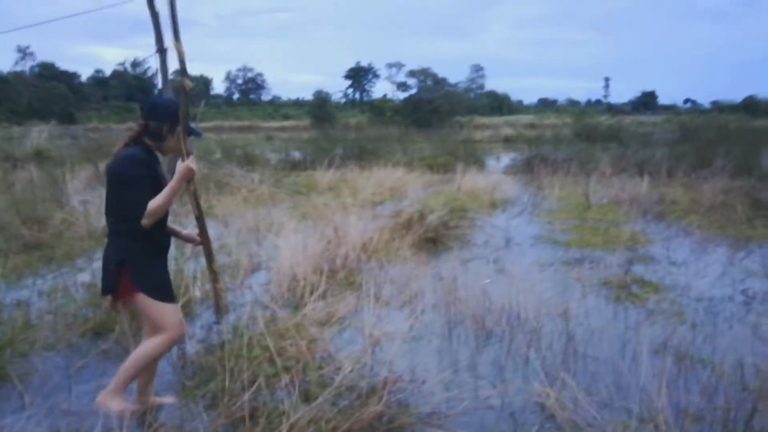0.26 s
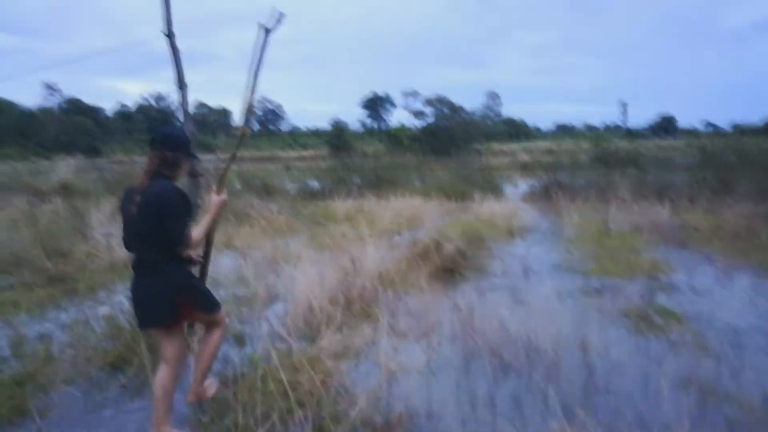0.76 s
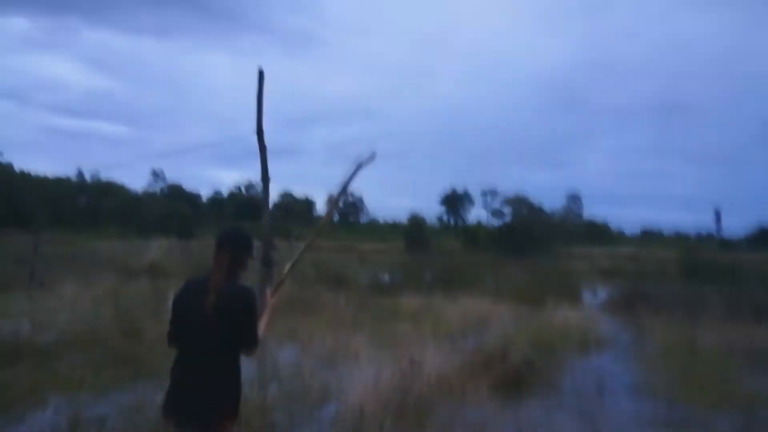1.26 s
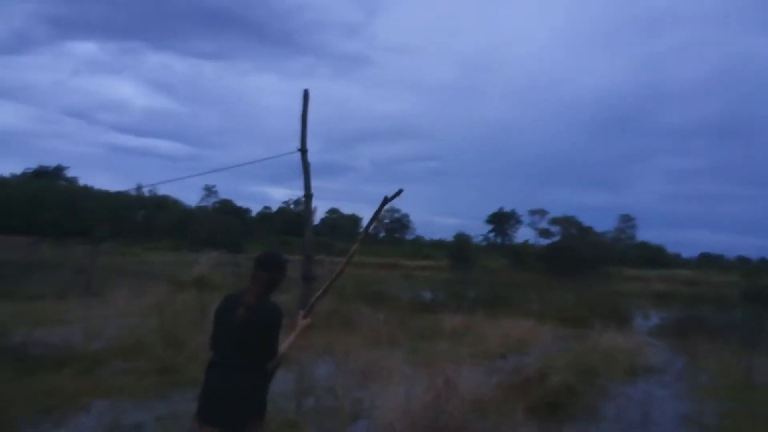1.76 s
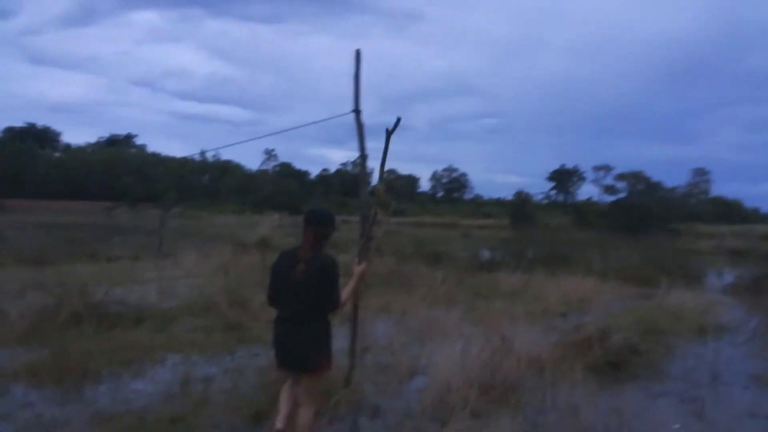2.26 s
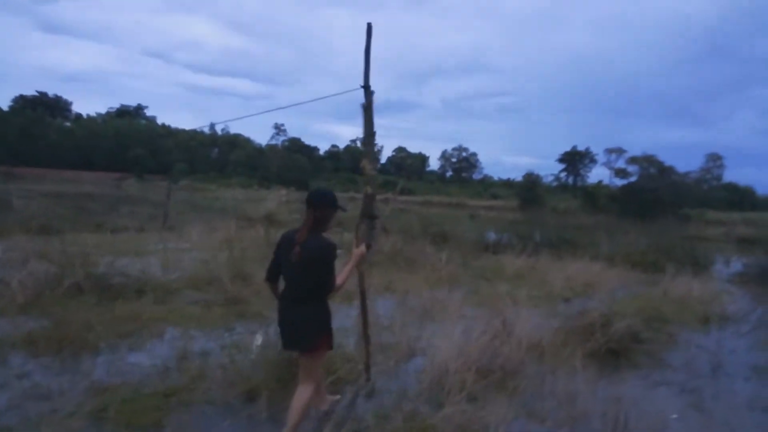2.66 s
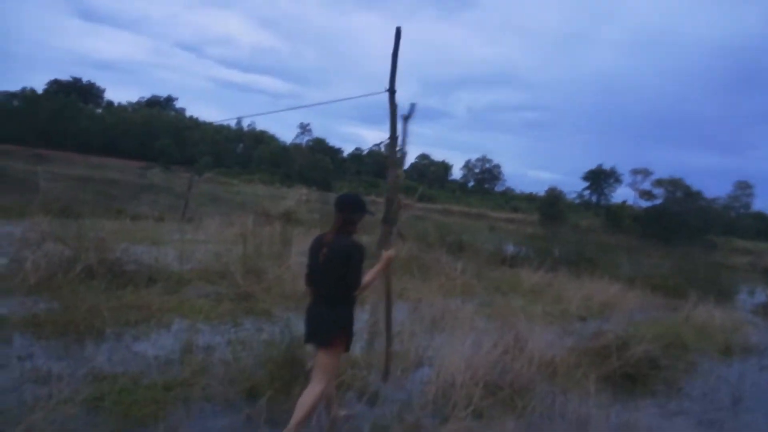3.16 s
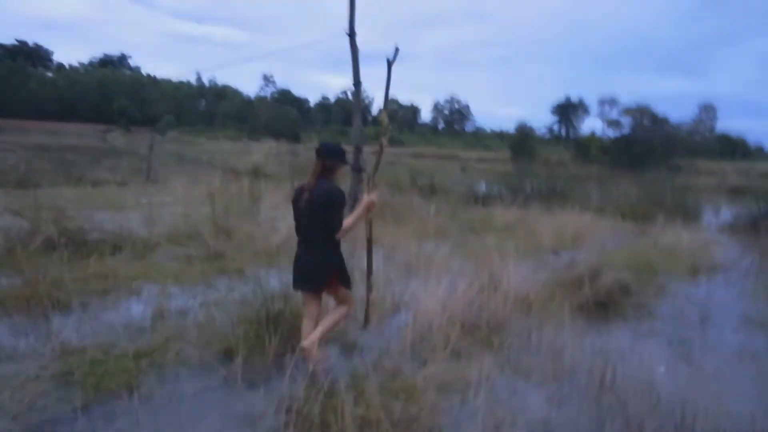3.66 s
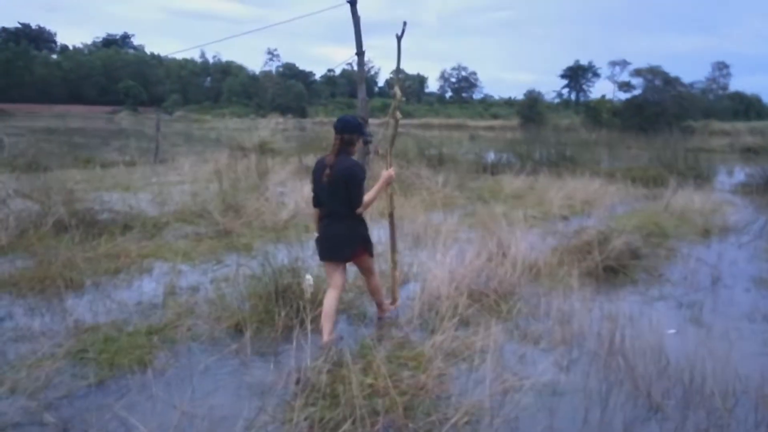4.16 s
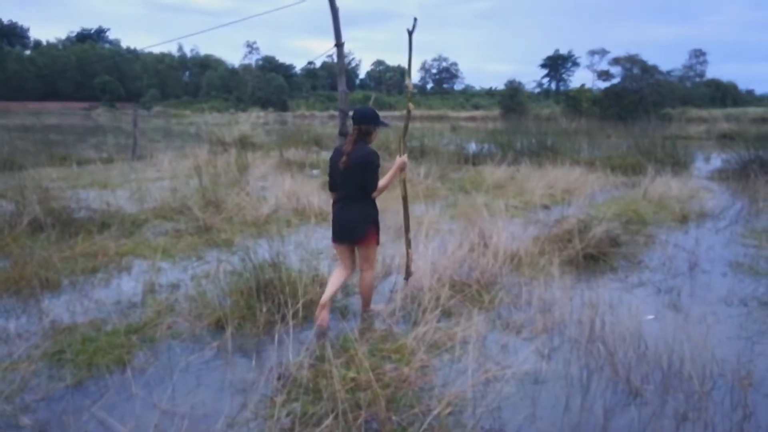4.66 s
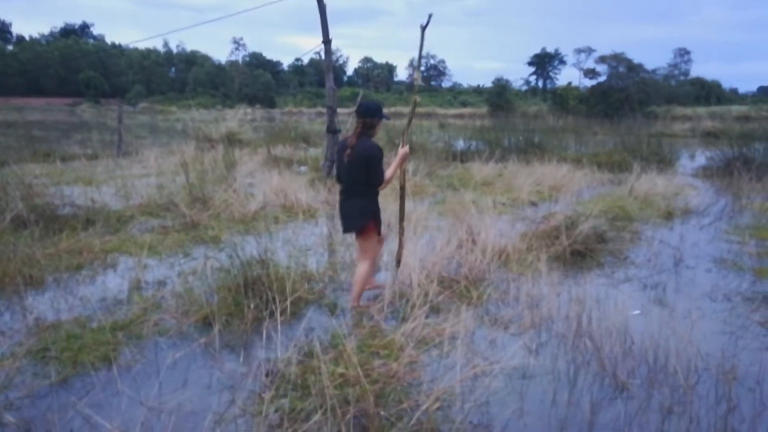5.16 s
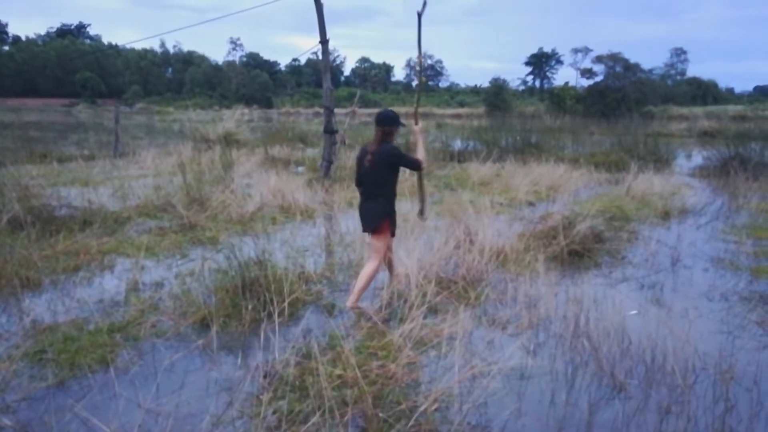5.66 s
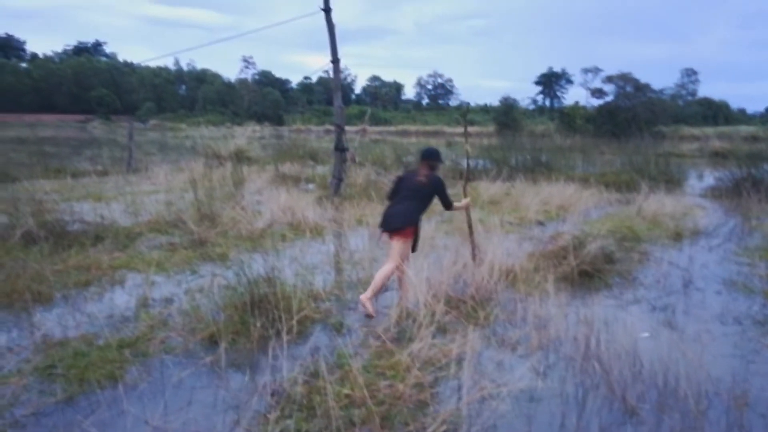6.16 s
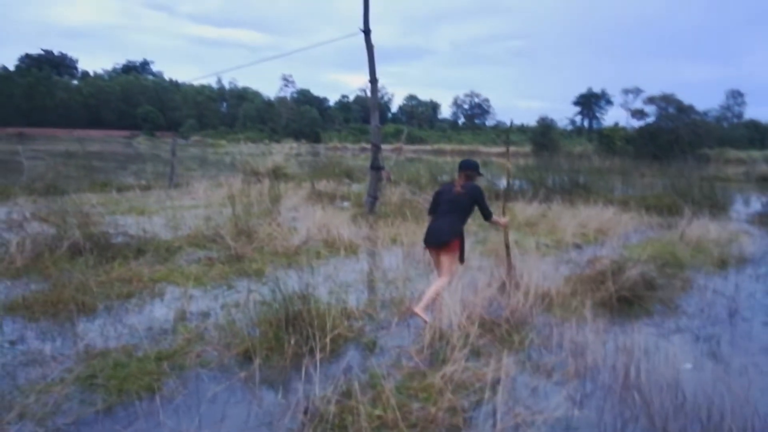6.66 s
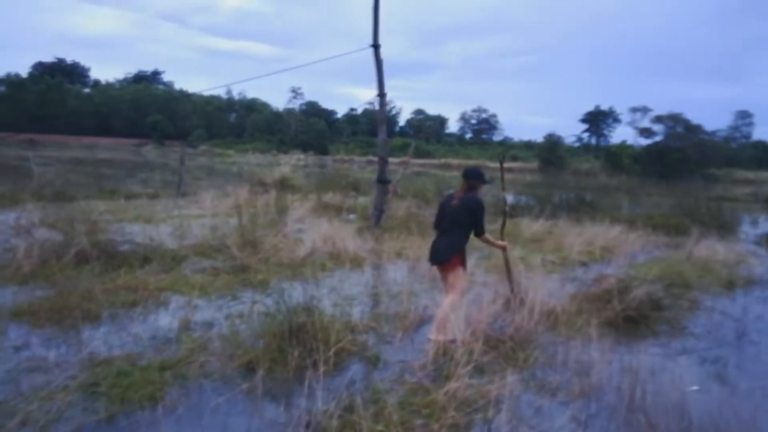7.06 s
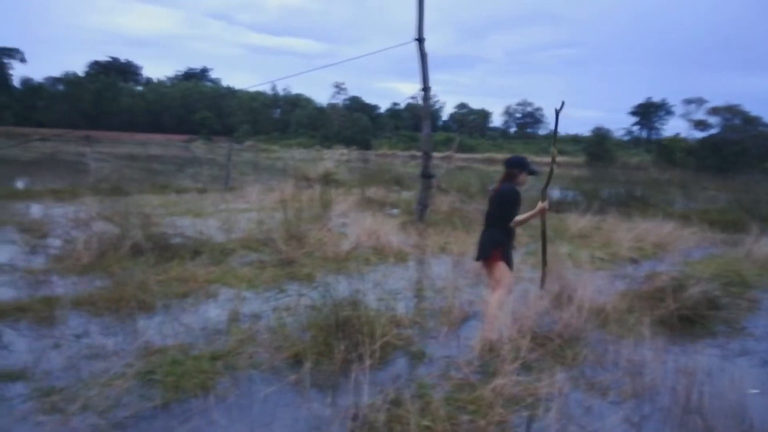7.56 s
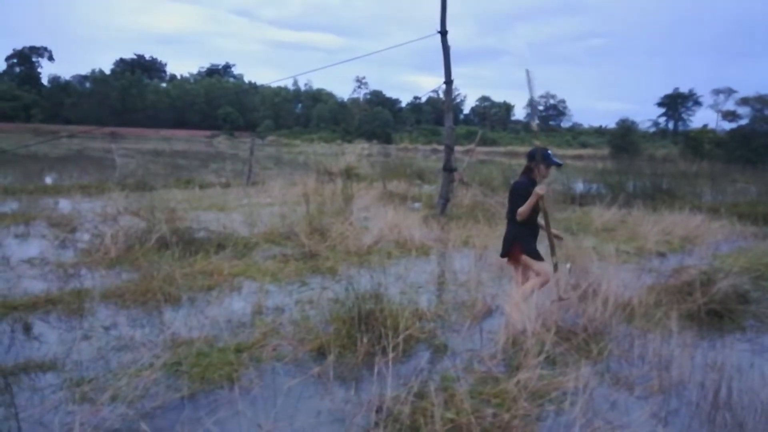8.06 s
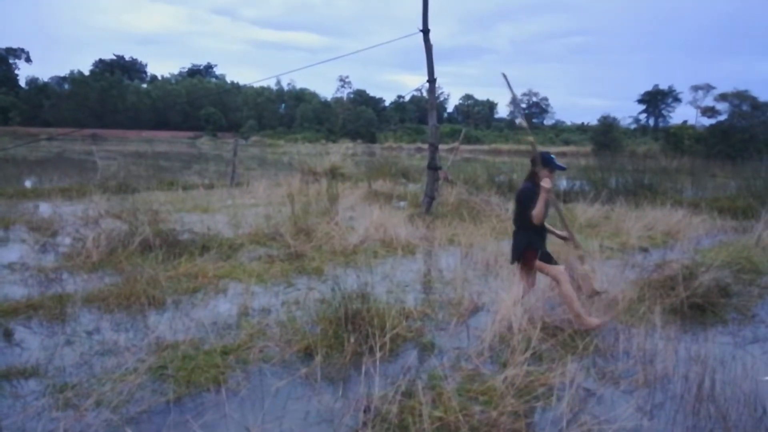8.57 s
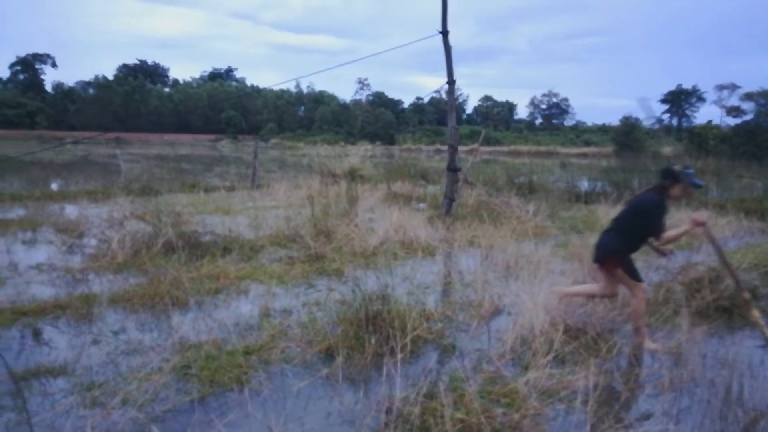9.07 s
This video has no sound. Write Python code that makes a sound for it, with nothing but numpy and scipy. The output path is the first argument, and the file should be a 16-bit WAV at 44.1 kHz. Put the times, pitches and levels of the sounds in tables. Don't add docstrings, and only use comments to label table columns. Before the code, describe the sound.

Outdoors in a flooded grassy field, about a dozen frogs give short buzzy quacks, several per second, left and right, over a blurred distant chorus. A person wades past with soft swishes; around six seconds a stalk tears and snaps very loudly, followed by sloshing. Frogs thin out near the snap, then quack densely again. A moving stereo microphone, duller on the left, catches low wind.

```python
import sys
import numpy as np
from scipy import signal
from scipy.fft import rfft, irfft
from scipy.io import wavfile
from scipy.ndimage import uniform_filter1d

SR = 44100
rng = np.random.default_rng(int(sys.argv[2]) if len(sys.argv) > 2 else 0)


def volts(x):
    e = np.asarray(x, float) / 20
    return 10 ** e


def file_out(sig):
    cols = np.atleast_2d(sig).T
    lim = np.clip(cols, -1, 1)
    pcm = np.round(lim * 32767).astype(np.int16)
    wavfile.write(sys.argv[1], SR, pcm)


N = 410130

ROUGH_JITTER = .018


def shape(x, points):
    hz, db = np.transpose(points)
    f = np.maximum(np.fft.rfftfreq(x.shape[-1], 1 / SR), 1)
    gain = volts(np.interp(np.log(f), np.log(hz), db))
    return irfft(rfft(x) * gain, x.shape[-1])


def unit(x):
    return x / np.sqrt(np.mean(x ** 2))


def curve(table):
    s, *columns = np.transpose(table)
    return [np.interp(np.arange(N) / SR, s, c) for c in columns]


def add(out, s, sound):
    i = int(s * SR)
    out[:, i:i + sound.shape[-1]] += sound[..., :max(N - i, 0)]


def resonance(f, hz, width_hz, order=2):
    h = (1j * f * width_hz / (hz ** 2 - f ** 2 + 1j * f * width_hz)) ** order
    return h / np.sqrt(np.mean(np.abs(h) ** 2))


def edge(f, hz, order):
    return 1 / np.sqrt(1 + (np.maximum(f, 1) / hz) ** (2. * order))


def walk(rate):
    k = int(SR / rate)
    held = np.repeat(rng.standard_normal(N // k + 1), k)
    return unit(uniform_filter1d(uniform_filter1d(held, k), k)[:N])


def flutter(x, span):
    wobble = rng.standard_normal(x.shape)
    for _ in range(4):
        wobble = uniform_filter1d(wobble, span)
    return unit(wobble)


def pulses(length, mid_hz, glide, jitter, attack, fading, size):
    u = np.arange(int(length * SR)) / (length * SR)
    start, settle, drift, turn = glide
    percent = start * np.exp(-u / settle) + drift * (u - .45)
    percent = percent + turn * np.clip((u - .7) / .3, 0, 1) ** 2
    phase = np.cumsum(mid_hz * (1 + percent / 100)) / SR
    chance = rng.standard_normal((80, 2))[:int(phase[-1]) + 1].T
    at = np.interp(np.arange(chance.shape[1]) + jitter * np.cumsum(chance[0]), phase, u)
    swell = 1 - 1.5 * attack * (1 - np.sin(np.pi / 2 * np.minimum(at / attack, 1)))
    swell = swell * (1 + (attack < .01) * .5 * np.exp(-at * length / .008))
    fade = np.sin(np.pi / 2 * np.clip((1.04 - at) / fading, 0, 1))
    push = swell * fade * volts(50 * jitter * chance[1]) * np.sqrt(SR / mid_hz)
    delay = at * length * SR + 20
    shifts = np.exp(-2j * np.pi * np.outer(delay, np.arange(size // 2 + 1)) / size)
    return push * np.array([1 - at, at]) @ shifts


def sac_and_body(f, hz, heard, lo_hz, ratio, jitter):
    # f/Hz, width/Hz, polarity
    body_modes = [(2100, 1100, 1), (5000, 1600, 1), (6400, 2200, -1)]
    rough = jitter > ROUGH_JITTER
    depth, order = (.9, 2.2) if rough else (1, 2)
    body = np.array([sign * resonance(f, mode_hz * d, width * d)
                     for (mode_hz, width, sign), d in zip(body_modes, (depth, 1, 1))])
    band = edge(f, lo_hz, order=-5) + volts(-17) * edge(f, 600, order=-3)
    band = band * edge(f, 7500 / depth ** 4.5, order=9)
    overtone = resonance(f, ratio * hz, 850) * edge(f, 13000 * max(ratio / 3, 1), order=9)
    if rough:
        overtone = overtone + volts(-25) * resonance(f, 3.8 * hz, 600)
    damping = .8 if jitter <= .01 else 1.15 if rough else 1
    sac = band * resonance(f, hz, 700 * damping, order)
    return heard @ np.vstack([band * body, overtone]) - sac


def frogs():
    # t/s, length/s, level/dB, midway pulse rate f/Hz
    near_right = [
        (0.0, .034, -21.5, 486.5),
        (.177, 0.06, -23, 474),
        (.391, 0.063, -23.5, 480),
        (.604, 0.057, -23.5, 471),
        (.815, 0.056, -22.5, 482.5),
    ]
    steady_left = [(0.452, 0.041, -33, 469), (0.825, 0.075, -28.5, 451), (1.109, 0.069, -25.5, 447.4),
                   (1.378, 0.091, -26.5, 453), (1.674, 0.062, -26.5, 437), (1.981, 0.058, -26, 438),
                   (2.263, 0.076, -27, 435.5), (2.538, 0.081, -28, 440), (2.814, 0.0845, -28.5, 435),
                   (3.107, 0.062, -27, 431), (3.404, 0.077, -28.5, 429), (3.664, 0.09, -28.5, 442.4)]
    deep_left = [(.25, 0.054, -31, 451), (0.553, 0.059, -32, 443.4), (1.136, 0.05, -29.5, 435),
                 (1.405, 0.041, -26.5, 433), (1.628, 0.049, -25.5, 439), (1.849, 0.067, -27, 448),
                 (2.11, 0.069, -27.5, 437.6), (2.389, 0.075, -26.5, 438.5), (2.623, 0.065, -26.5, 438),
                 (2.835, 0.063, -27, 436), (3.05, 0.064, -26.5, 432), (3.261, 0.074, -28.5, 426),
                 (3.481, 0.072, -28, 431), (3.708, 0.062, -29, 422.5), (3.896, 0.067, -26, 416.4),
                 (4.119, 0.079, -27.5, 424), (4.347, 0.029, -28.5, 426)]
    small_right = [(.756, 0.043, -38.5, 507), (0.976, 0.047, -35.5, 486), (1.19, 0.048, -32, 479.4),
                   (1.393, 0.05, -33, 449), (1.606, 0.033, -32.5, 491), (1.813, 0.055, -31.5, 465),
                   (2.019, 0.046, -29.5, 445.6)]
    far_singer = [(3.335, 0.063, -37, 586), (3.588, 0.083, -36.5, 576), (4.653, 0.076, -36.5, 545),
                  (5.207, 0.068, -37.5, 559), (5.464, 0.07, -40.5, 552), (5.717, 0.073, -36, 554),
                  (5.985, 0.061, -37, 518), (6.223, 0.069, -40, 500), (9.138, 0.13, -33, 482)]
    rasper = [(3.664, 0.058, -31.5, 339.3), (3.877, 0.035, -30.5, 338), (3.914, 0.058, -27, 196),
              (3.979, 0.025, -31, 391), (4.008, 0.041, -31.5, 413), (4.145, 0.055, -27, 371),
              (4.199, 0.021, -27.5, 331.4), (4.23, 0.036, -28.5, 188.5), (4.269, 0.01, -35.5, 405),
              (4.375, 0.09, -25.5, 346), (4.568, 0.09, -27, 328.4), (4.755, 0.084, -28.5, 346.2),
              (4.939, 0.078, -27, 347.4), (5.119, 0.029, -27.5, 399.5), (5.165, 0.021, -29.5, 357.6),
              (5.205, 0.018, -30.5, 314)]
    stutterer = [(0.23, 0.043, -34, 396), (0.494, 0.026, -44, 390), (6.631, .015, -37, 424),
                 (7.239, 0.043, -29.5, 394), (7.411, 0.023, -29, 392), (7.44, 0.037, -29.5, 196.7),
                 (7.55, 0.06, -39.5, 165.6), (7.637, 0.053, -31, 452), (7.793, 0.029, -25, 431),
                 (7.846, 0.032, -29, 355), (7.884, 0.02, -31.5, 284), (8.011, 0.033, -27.5, 413),
                 (8.071, 0.019, -28.5, 334.4), (8.11, 0.017, -30, 306), (8.249, 0.03, -28.5, 438.6),
                 (8.312, 0.018, -28.5, 358), (8.357, 0.014, -30, 414), (8.5, 0.03, -27, 412),
                 (8.57, 0.023, -29.5, 424)]
    clear_right = [(6.97, 0.056, -27, 452.3), (7.238, 0.062, -26, 448), (7.479, 0.063, -25.5, 416.4),
                   (7.706, 0.063, -26, 423), (7.926, 0.063, -26.5, 426), (8.137, 0.068, -26.5, 434),
                   (8.358, 0.066, -26.5, 441.7), (8.568, 0.072, -27.5, 441), (8.79, 0.068, -27.5, 435.3),
                   (9.027, 0.067, -28, 435)]
    bright_left = [(6.832, 0.052, -31, 329.5), (7.1, 0.058, -30.5, 364.5), (7.35, 0.058, -29.5, 373),
                   (7.585, 0.063, -29.5, 392), (7.81, 0.062, -29.5, 403.4), (8.03, 0.071, -30.5, 417),
                   (8.249, 0.065, -30, 415), (8.475, 0.0575, -31.5, 416.5), (8.702, 0.072, -31.5, 421.4),
                   (8.93, 0.046, -29, 413), (9.165, 0.068, -32, 423.5)]
    loud_left = [
        (8.73, 0.026, -30.5, 463),
        (8.959, 0.034, -27.5, 463.4),
        (9.18, 0.0527, -28.5, 472.3),
    ]
    falling = [
        (6.331, 0.059, -37.5, 542),
        (6.552, 0.075, -34, 548),
        (6.785, .08, -33, 499),
        (7.004, 0.071, -35.5, 530),
    ]
    distant = [(2.331, 0.082, -45, 500), (2.779, 0.06, -43, 499), (2.971, 0.078, -40, 521),
               (3.2, 0.077, -39.5, 510), (5.948, 0.036, -48.5, 470), (6.15, 0.078, -44.5, 475),
               (6.385, 0.051, -42.5, 508), (6.47, 0.059, -48, 500), (6.656, 0.051, -44.5, 484)]
    tables = (near_right, steady_left, deep_left, small_right, far_singer, rasper, stutterer, clear_right,
              bright_left, loud_left, falling, distant)
    # t/s, left minus right level/dB
    bearings = [
        [(.4, -6.5)],
        [(2, -0.5)],
        [(1.14, -1), (2.2, 3), (4.3, 5)],
        [(1.4, -18), (2.02, -14.5)],
        [(3.22, 3.5), (3.32, -18.5)],
        [(3.66, -8), (5.1, -8)],
        [(.3, -14.5), (7.5, -5), (7.7, -5)],
        [(6.97, -6), (7.7, -12.5)],
        [(8, 8)],
        [(8.96, 16.5), (9.18, 14)],
        [(6.33, -4.5), (6.79, -1)],
        [(3, 9.5), (6, -5.5)],
    ]
    starts_percent = [
        [1.9, 26, 28, 52, 45],
        [7, 9, 7, 10.5, -1.5, 7, 14, 8.5, 4.5, 2, 4.5, 6],
        [8.5, 5, -2.5, -0.5, 10.5, 31, 29, 25.5, 25, 21, 21.5, 25.5, 10, 3.5, 13, 16, 18],
        [-7.5, 8, 13.5, 0, 4.5, 9, 3.5],
        [-8, -12.5, -9.5, -11, 6, -4.5, 8.5, 8, 4],
        [11.5, 7.5, -2, 11, -0.5, 10.5, 8, 1, -4, 17, 18, 14, 15.5, 5.5, 5.5, 4],
        [0, 0, 0, 0, 0, 0, 0, 0, 0, 0, 0, 0, 0, 0, 0, 0, 0, 0, 0],
        [-8.5, 0.5, -25.5, -11, -3.5, 0, 11.5, 14, 15, 21.5],
        [-6, -11, -9, -7.5, -12.5, -8, 2, -7.5, -4, -1, 2.5],
        [13, 13.3, 13.6],
        [1, -2.5, 16, -0.5],
        [0, 0, 0, 0, 0, 0, 0, 0, 0],
    ]
    glides = [(0.15, -2, -0.5, 5.5), (0.1217, -2.5, -5, -2), (0.1087, 3, 2.5, 11.5), (0.124, -1, -15.5, -2),
              (0.211, 0, -0.5, -20.5), (0.121, -30.5, -33.5, -4.5), (.15, -23.5, -21, -8),
              (0.1213, -2.5, -8, -3), (0.204, 3.5, 2.5, -1), (0.148, -3.5, -2.5, 5.5),
              (0.144, -18, -25.5, -1.5), (.15, -8, -10, 3)]
    sacs_hz = [3850, 3870, 3697, 3670, 4044, 3622, 3590, 3870, 3945, 3400, 3510, 3610]
    # left lead/ms, attack/share of call, fading/share of call
    throats = [(.27, .3, .3), (.43, .22, .35), (.39, .15, .3), (-.23, .25, .35), (.07, .55, .5),
               (-.27, .005, .3), (-.32, .005, .5), (.17, .1, .4), (.39, .01, .3), (.39, .3, .15),
               (.32, .6, .2), (.1, .5, .5)]
    jitters = [.013, .012, .011, .013, .01, .022, .028, .008, .011, .013, .013, .06]
    left_hears_db = [(-18.5, -17, -12.5), (-25, -22, -63), (-15.5, -16.5, -21), (-7.5, -4, -9),
                     (-11, -11, -51), (-13.5, -3.5, -58), (-18, -16.5, -52), (-15, -14, -17),
                     (-21, -6, -18), (-20, -18.5, -11), (-11.5, -2.5, -45.5), (-49, -12, -45)]
    right_hears_db = [(-17, -13.5, -12, -25.5), (-24, -65, -15.5, -31), (-18.5, -22, -13.5, -23),
                      (-27.5, -47, -11.5, -22), (-24.5, -18.5, -62, -56), (-23.5, -14.5, -15.5, -12.5),
                      (-18.5, -18.5, -15, -13.5), (-21.5, -11.5, -21.5, -22), (-13, -19, 1.5, -25),
                      (-5.5, -4, -1.5, -6.5), (-15, -25, -11, -40), (-25, -14, -45, -45)]
    voice_lo_hz = [1350, 1950, 1680, 1530, 1440, 1320, 1320, 1450, 1490, 1450, 1950, 1500]
    overtone_ratios = [3, 2.6, 2.6, 3.35, 3, 2.9, 2.95, 3.2, 3, 3, 3, 3]

    out, size = np.zeros((2, N)), 6144
    f = np.fft.rfftfreq(size, 1 / SR)
    sag, scatter = .025, .015
    per_frog = zip(tables, bearings, starts_percent, glides, sacs_hz, throats, jitters,
                   left_hears_db, right_hears_db, voice_lo_hz, overtone_ratios)
    for calls, bearing, starts, glide, sac_hz, throat, jitter, left_db, right_db, lo_hz, ratio in per_frog:
        settle, *drifts, turn = glide
        lead_ms, *push = throat
        hoarse = .22 if jitter > ROUGH_JITTER else .1
        heard = volts(np.array([(*left_db, -51), right_db]))
        delays_s = .0005 + .006 * rng.random((2, 5, 1))
        path = 1 + volts(-13.5) * np.exp(-2j * np.pi * delays_s * f).sum(axis=1)
        path = path * np.exp(1j * np.pi * np.outer([lead_ms, -lead_ms], f) / 1000)
        for (s, length, db, mid_hz), start, drift in zip(calls, starts, np.linspace(*drifts, len(calls))):
            pan_db = np.interp(s, *np.transpose(bearing))
            taut, slack = pulses(length, mid_hz, (start, settle, drift, turn), jitter, *push, size=size)
            hz = sac_hz * (1 + scatter * rng.standard_normal())
            early = sac_and_body(f, hz * (1 + sag), heard, lo_hz, ratio, jitter) * taut
            late = sac_and_body(f, hz * (1 - sag), heard, lo_hz, ratio, jitter) * slack
            call = irfft(path * (early + late), size)
            gain = volts(db + np.array([[pan_db], [-pan_db]]) / 2)
            add(out, s, gain * call * (1 + hoarse * flutter(call[0], 36)))
    return out


def field(x):
    t = np.arange(SR // 2) / SR
    t60_s = 0.31
    tail = rng.standard_normal((2, len(t))) * volts(-60 * t / t60_s) * np.minimum(t / 0.0075, 1)
    tail = shape(tail, [(1500, 10.5), (3000, 10.5), (4500, 8.0), (6000, 10.5), (12000, -17.5)])
    return signal.fftconvolve(x, tail / np.linalg.norm(tail[0]), axes=1)[:, :N]


def far_chorus():
    # t/s, level/dB
    hush = [
        (4.9, -2.5),
        (5.35, -16),
        (5.9, -12),
        (6.2, 9.5),
        (6.75, -6),
        (7.0, 1),
    ]
    out, size = np.zeros((2, N)), 4096
    f = np.fft.rfftfreq(size, 1 / SR)
    glide = (-0.5, 0.26, -29.5, -35.5)
    for when, pitch, sac, side in rng.random((260, 4)):
        hz = 400 + 150 * pitch
        voice = resonance(f, 3400 + 1100 * sac, 640) + 0.16 * resonance(f, 2090, 1300)
        train = pulses(0.032, hz, glide, 0.0433, 0.88, 0.46, size=size).sum(axis=0)
        call = irfft(voice * train, size)
        add(out, when * N / SR, call * np.array([[side], [1.4 - side]]))
    return volts(-49.5 + curve(hush)[0]) * unit(field(out))


def strokes():
    # t/s, length/s, hiss level/dB, slosh level/dB
    stroke_table = [
        (0.566, 0.39, -51.5, -91),
        (3.783, 0.099, -32.5, -64),
        (5.158, 0.88, -59.5, -98),
        (5.7, 0.17, -55, -50),
        (6.006, 0.22, -48, -65),
        (6.261, 0.49, -45.5, -57.5),
        (6.293, 0.23, -73, -68),
        (7.198, 3.7, -54.5, -74),
        (8.682, 0.22, -44.5, -75),
        (8.935, 0.15, -46, -48.5),
    ]
    t = np.arange(N) / SR
    gains = volts(np.array([[-60.5], [-71.5]]))
    rise, fall = 0.16, 0.32
    for s, length, *db in stroke_table:
        u = (t - s) / length
        envelope = np.clip(np.minimum(u / rise, (1 - u) / fall), 0, 1) ** 2
        gains = gains + volts(np.array(db))[:, None] * envelope
    return gains


def wading():
    hiss_gain, slosh_gain = strokes()
    tear_s, hold_s, tear_db, fray_db, fray_db_per_s = 6.074, 0.0058, -17, -29, -450
    since = np.arange(N) / SR - tear_s
    fraying_db = fray_db + fray_db_per_s * np.maximum(since - 3 * hold_s, 0)
    tear_gain = (since > 0) * np.where(since < hold_s, volts(tear_db), volts(fraying_db))
    tear_gain = uniform_filter1d(tear_gain, size=100)
    drops = (rng.random((2, N)) < 130 / SR) * volts(np.minimum(3 * rng.exponential(size=(2, N)), 8))
    hardness = np.minimum(hiss_gain / volts(-47.5), 1)
    spray = rng.standard_normal((2, N)) * (1 + 35 * hardness * uniform_filter1d(drops, size=50))
    hiss = shape(spray, [(1500, -40.0), (4500, -2), (7000, -10), (9200, -1), (10800, -4), (13000, -3), (16000, -9)])
    slosh = shape(spray[::-1], [(350, -39), (700, 1.0), (1000, 1.5), (2000, 7.0), (5000, -4.0), (7000, -13)])
    tear = shape(spray[:, ::-1], [(200, -10.0), (1000, -7), (4500, -2.5), (6500, -12.0), (9500, 5.0), (15000, -14.5)])
    hiss_flicker_db = 3.2 * walk(18) + 3 * walk(4)
    slosh_flicker_db = 4 * walk(70)
    return (hiss_gain * volts(hiss_flicker_db) * unit(hiss) + slosh_gain * volts(slosh_flicker_db) * unit(slosh)
            + tear_gain * unit(tear))


def wind():
    # t/s, level/dB
    gusts = [(0.0, -53), (0.07, -48), (0.36, -58.5), (0.83, -52.5), (1.73, -52.5), (2.07, -46), (2.1, -51),
             (3.0, -58), (3.21, -49), (4.74, -54.5), (6.24, -51), (6.86, -58), (6.89, -50.5), (7.48, -54.5),
             (9.27, -52), (9.3, -64)]
    # f/Hz, level per Hz/dB
    air = [(30, -19.5), (65, 1.5), (78, 1.5), (92, 1), (125, -4.5), (155, -16), (700, -44), (1500, -46.5)]
    mid, side = rng.standard_normal((2, N))
    side = shape(side, [(60, -29), (125, -20.0), (250, -5.0), (500, 3.5)])
    rumble = volts(curve(gusts)[0]) * unit(shape(np.array([mid + side, mid - side]), air))
    t = np.arange(N) / SR
    hum_hz, hum_db, grows_db_per_s = 270, -74.5, 0.67
    hum_gain = volts(hum_db + grows_db_per_s * (t - 3.0) + 1.94 * walk(2.8))
    return rumble + hum_gain * np.sin(2 * np.pi * hum_hz * t)


def snaps():
    # t/s, peak level/dB, ring f/Hz, t60/s
    struck = [(0.067, -34, 10900, 0.0072), (1.482, -39, 12800, .012), (1.522, -29.5, 6720, 0.021),
              (1.538, -40, 6800, .01), (3.809, -27, 8500, 0.0071), (3.818, -30, 3930, 0.0062),
              (3.823, -42, 9000, 0.0035), (5.839, -30, 11300, 0.0053), (5.859, -32, 4940, 0.0045),
              (6.0965, -1.5, 4800, 0.0061), (6.0985, -21.5, 2470, 0.009), (6.5, -20.5, 9200, 0.0061),
              (6.512, -36.5, 1540, 0.014), (6.553, -22.5, 4200, .012), (6.775, -39, 8600, 0.0049)]
    # t/s, peak level/dB, ring f/Hz
    ticks = [(0.3301, -55, 8650), (0.3581, -54, 10700), (0.5043, -36, 8790), (0.6845, -36, 8590),
             (0.7238, -46, 11500), (0.9328, -43, 8640), (1.0694, -56, 9820), (1.0844, -51, 9050),
             (8.7694, -23, 8510), (9.0198, -26, 8800), (9.129, -37, 9510), (9.2708, -37, 12800)]
    out, t = np.zeros((2, N)), np.arange(800) / SR
    tick_gain_db, tick_t60_s, pan_db = 3, 0.006, -7.5
    for s, db, hz, t60 in struck + [(s, db + tick_gain_db, hz, tick_t60_s) for s, db, hz in ticks]:
        ring = np.sin(2 * np.pi * hz * t) * volts(-60 * t / t60) * np.minimum(t * hz / 1.0, 1) ** 2
        click = 0.29 * np.gradient(rng.standard_normal(len(t))) * volts(-60 * t / 0.0076)
        add(out, s, volts(db + np.array([[pan_db], [-pan_db]]) / 2) * (ring + click))
    return out


def peeps():
    # t/s, length/s, start f/Hz, end f/Hz, level/dB
    voices = [
        (1.33, 0.022, 2000, 2010, -54),
        (1.454, 0.039, 1670, 2120, -50.5),
        (4.535, 0.028, 1800, 1950, -64),
        (4.89, .025, 1200, 1180, -75),
        (5.08, 0.026, 2050, 1990, -49),
    ]
    pips = [
        (6.628, 0.018, 1730, 1840, -43),
        (7.202, 0.02, 1810, 2050, -56),
        (7.316, 0.0085, 1900, 1910, -47.5),
        (8.482, 0.012, 2320, 2500, -30.5),
    ]
    drips = [
        (.957, 0.0075, 1920, 2150, -64.5),
        (2.783, 0.039, 790, 1300, -63.5),
        (3.424, .031, 900, 1180, -63),
        (5.552, 0.033, 960, 990, -68),
        (8.906, 0.014, 1100, 1200, -56),
    ]
    plops = [(6.338, 0.0091, 1350, 1450, -46), (6.383, 0.011, 850, 950, -58), (6.49, 0.0075, 650, 810, -59),
             (6.573, 0.006, 450, 600, -59), (8.794, 0.011, 715, 865, -60), (8.938, .013, 750, 850, -63),
             (9.002, .01, 800, 950, -56), (9.044, 0.017, 910, 1010, -58)]
    out = np.zeros((2, N))
    throat_hz, slope_db = 6800, 16
    for table, over_db in zip((voices, pips, drips, plops), (0, -10, -30, -30)):
        for s, length, start_hz, end_hz, db in table:
            phase = 2 * np.pi * np.cumsum(np.linspace(start_hz, end_hz, int(length * SR))) / SR
            overtones = 0
            for k in range(2, 6):
                octaves = abs(np.log2(k * start_hz / throat_hz))
                overtones = overtones + volts(2 * rng.standard_normal() - slope_db * octaves) * np.sin(k * phase)
            tone = np.sin(phase) + volts(over_db) * overtones
            add(out, s, volts(db) * tone * signal.windows.tukey(len(phase), .6) * np.array([[.8], [1.8]]))
    return out


def chirp():
    # t/s, length/s, start f/Hz, end f/Hz, level/dB
    s, length, start_hz, end_hz, db = (2.455, .026, 1435, 1540, -47)
    harmonics_db = [0.5, 12, 12, -8, -3, 3.5]
    out = np.zeros((2, N))
    u = np.linspace(0, 1, int(length * SR))
    phase = 2 * np.pi * np.cumsum(start_hz + (end_hz - start_hz) * u ** 3) / SR
    tone = volts(np.array(harmonics_db)) @ np.sin(np.outer(np.arange(1, 7), phase))
    add(out, s, volts(db) * tone * signal.windows.tukey(len(u), .5) * np.array([[.8], [1.8]]))
    return out


def scene():
    near = frogs() + peeps() + chirp()
    near[0] = shape(near[0], [(7000, -1.5), (8500, -8)])
    rustle = wading() + snaps()
    rustle[0] = shape(rustle[0], [(4500, -4.5), (9000, -22)])
    echoes = volts(-21) * field(near * flutter(near, span=80))
    return near + echoes + far_chorus() + rustle + wind()


def roll_off(x):
    return signal.sosfilt(signal.butter(12, 15900, fs=SR, output="sos"), x)


def record(dry):
    # from f/Hz, level/dB
    starve = [(12200, -54), (13000, -50), (14000, -49), (15000, -48)]
    f, frame = np.fft.rfftfreq(N, 1 / SR), 1024
    spectrum = rfft(dry) * edge(f, 15850, order=50)
    lean = irfft(spectrum, N)

    def block_power(x):
        return np.mean(x[:, :N // frame * frame].reshape(2, -1, frame) ** 2, axis=(0, 2))

    whole = block_power(lean)
    for (hz, db), (top_hz, _) in zip(starve, starve[1:] + [(SR / 2, 0)]):
        band = irfft(spectrum * ((f >= hz) & (f < top_hz)), N)
        threshold_db = db + 1.5 * rng.standard_normal(len(whole))
        starved = block_power(band) < whole * volts(2 * threshold_db)
        gate = np.repeat(np.append(starved, starved[-1]) * 1., frame)[:N]
        lean = lean - .97 * uniform_filter1d(gate, size=300) * band
    mix = np.clip(lean, -1, 1)
    return roll_off(mix)


dry = scene()
out = record(dry)
file_out(out)
```